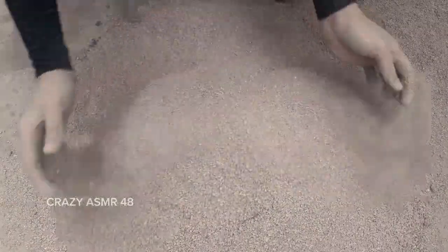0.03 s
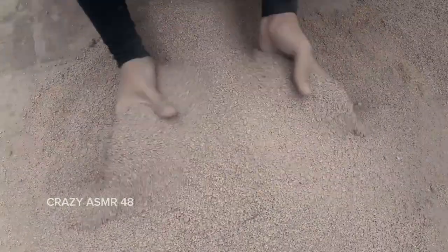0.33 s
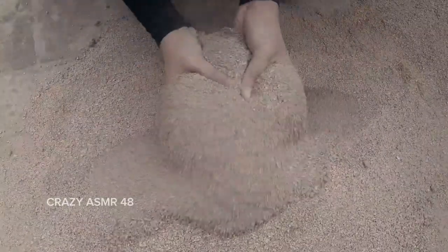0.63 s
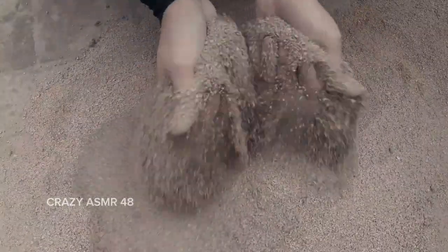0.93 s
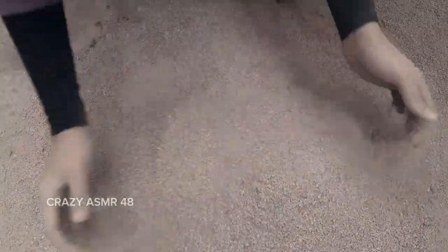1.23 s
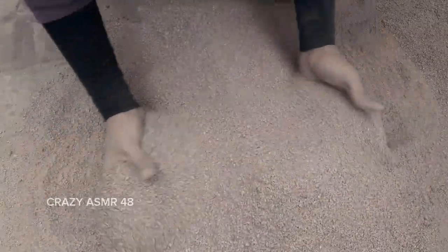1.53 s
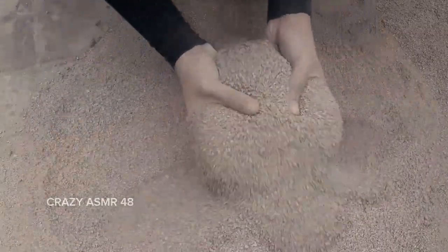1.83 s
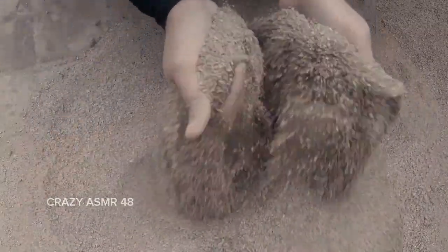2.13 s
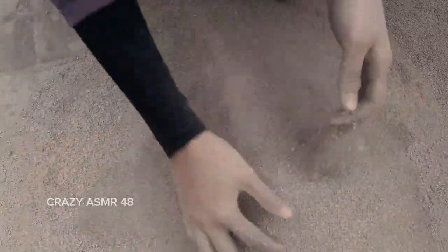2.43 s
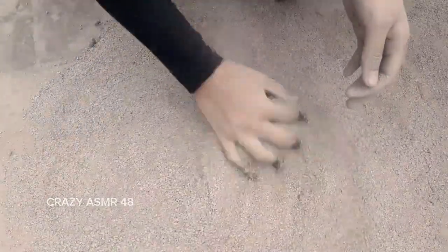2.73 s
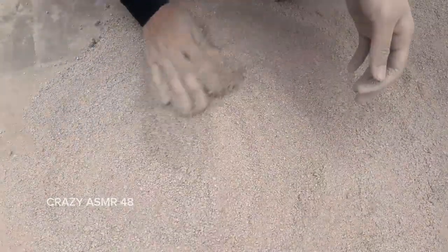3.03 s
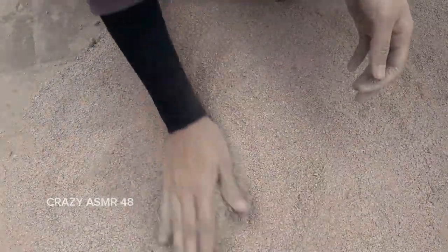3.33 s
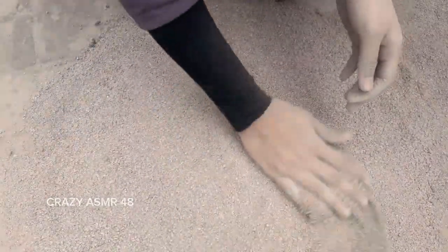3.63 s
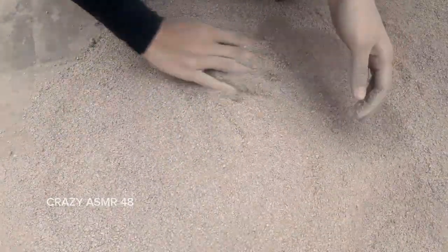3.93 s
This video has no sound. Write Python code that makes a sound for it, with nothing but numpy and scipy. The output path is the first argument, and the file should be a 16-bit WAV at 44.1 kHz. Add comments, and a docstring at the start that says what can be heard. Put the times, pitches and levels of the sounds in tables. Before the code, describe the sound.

Dry, gritty sand crunches and hisses as two hands dig in, lift it and let it pour, twice. A palm then softly brushes the heap smooth. The sound is close, with a faint motor droning far away.

```python
"""Two hands dig into dry, gritty sand, lift a heap that crumbles, and let it pour back in a fine hiss.
Just past one second they dig, lift and pour again. From about 2.5 s one palm brushes the heap smooth
in two strokes, and a few sharp grains tick. Each gesture is a dense shower of tiny grain contacts
with its own colour. A motor drones far away throughout. It is all heard close up and in mono,
through a small microphone with a resonant housing."""
import sys
import numpy as np
from scipy.fft import rfft, irfft, next_fast_len
from scipy.io import wavfile
from scipy.ndimage import map_coordinates

SR = 44100
rng = np.random.default_rng(int(sys.argv[2]) if len(sys.argv) > 2 else 0)


def store_wav(level_fs):
    """Save 16-bit WAV to argv[1]."""
    pcm = np.round(np.clip(np.atleast_2d(level_fs), -1, 1) * 32767)
    wavfile.write(sys.argv[1], SR, pcm.T.astype(np.int16))


N = 176400

# Gesture cues. A release loses 10 dB every release_s.
# fingers and palm skim the loose surface: start_s, attack_s, hold_s, release_s, level_db
SKIMS = [(-.06, 0.045, .04, 0.4, -43.5), (.12, 0.12, 0.015, 0.26, -32.5), (1.14, 0.05, 0.016, 0.076, -38.5),
         (1.33, .13, 0.014, .19, -32), (2.3, 0.082, .01, 0.12, -37), (2.47, 0.058, 0.078, 0.18, -36),
         (3.26, 0.053, 0.17, .1, -44), (3.45, 0.067, 0.078, 0.37, -42)]
# hands press through the heap: start_s, attack_s, hold_s, release_s, level_db
PUSHES = [(.15, 0.1, 0.31, 0.1, -27.5), (1.35, 0.21, 0.055, 0.23, -27.5)]
# a lifted double handful gives way in surges: start_s, attack_s, hold_s, release_s, level_db
CRUMBLES = [(.57, .31, 0.027, 0.11, -19), (.9, 0.027, 0.026, .055, -20), (1.8, 0.24, 0.061, .13, -21)]
# the flat palm strokes the heap: start_s, attack_s, hold_s, release_s, level_db
BRUSHES = [(2.46, 0.12, 0.19, 0.33, -39.5), (3.12, 0.43, 0.33, .14, -40)]
# fine sand streams off the fingers: start_s, attack_s, hold_s, release_s, level_db
POURS = [(-.05, 0.018, 0.059, 0.3, -29.5), (.17, .06, 0.022, 0.028, -30), (.56, 0.48, .05, .1, -33.5),
         (.8, 0.099, 0.34, 0.16, -27.5), (1.38, 0.083, 0.017, 0.046, -28.5), (1.6, .13, 0.19, 0.16, -38.5),
         (1.95, .25, 0.19, 0.19, -27.5), (2.34, 0.077, .03, 0.055, -28), (2.6, 0.28, .3, 0.34, -47),
         (3.24, 0.05, 0.024, 0.26, -38.5)]
# dislodged grains run down the slope: start_s, attack_s, hold_s, release_s, level_db
SLIDES = [(-.05, 0.046, 0.05, 0.069, -36.5), (.18, .05, .03, 0.039, -36), (1.39, 0.1, .02, 0.087, -44),
          (2.5, 0.3, 0.2, 0.09, -46), (3.45, .35, .14, .1, -41)]
# sharp grains knock together: start_s, level_db
TICKS = [(3.492, -31.5), (3.517, -32.5)]
# reflection off the moving palm: time_s, lowest_dip_hz, echo_gain
PALM_ECHO = [(2.45, 7900, 0), (2.7, 5940, 0.04), (3.0, 4470, 0.1), (3.2, 3200, 0.7), (3.28, 9700, 0.23),
             (3.45, 11100, 0), (3.56, 8000, 0), (3.72, 5360, 0), (4, 4173, 0)]

# Colours are EQ curves: they set the tone, not the level.
# raspy mids of a skim: frequency_hz, gain_db
SKIM_COLOUR = [(200, -8), (500, -7), (1000, 7), (1400, -1), (1800, 0.5), (2600, 3), (4300, 0), (6000, -5.5),
               (9000, -23), (15500, -8)]
# dull body of a push: frequency_hz, gain_db
PUSH_COLOUR = [(25, -35), (120, -1), (250, -0.5), (400, 0), (650, 0), (1100, 0), (1500, -6), (2200, -14.5),
               (4000, -34.5), (8500, -29), (15500, -30)]
# midrange crunch of a crumble: frequency_hz, gain_db
CRUMBLE_COLOUR = [(25, -45), (150, -39), (300, -7), (440, -7.5), (600, 2.5), (1100, 3.5), (1500, -2.5),
                  (2200, -4.5), (3200, -8), (5200, -15), (7000, -16), (9000, -19), (15500, -50)]
# soft rub of the palm: frequency_hz, gain_db
BRUSH_COLOUR = [(60, -32), (420, -9), (650, 3), (1100, -3.5), (1400, -15), (1800, -13), (2400, -14),
                (4000, -18.5), (15500, -36)]
# airy hiss of a pour: frequency_hz, gain_db
POUR_COLOUR = [(300, -15), (700, -38), (1500, -13.5), (3000, -18.5), (5200, -10), (7000, -11), (9000, -9.5),
               (11000, -1), (13500, 1), (15500, 5.5)]
# thin sizzle of a slide: frequency_hz, gain_db
SLIDE_COLOUR = [(1500, -21), (5000, -20.5), (6500, -2), (8000, -1.5), (10000, 2), (12000, 5.5),
                (15500, -3.5)]
# brittle top of a tick: frequency_hz, gain_db
TICK_COLOUR = [(2000, -30.5), (9000, -23), (11500, -13), (14000, -7), (15500, 5)]
# rumble and hiss of the still surroundings: frequency_hz, gain_db
AIR_COLOUR = [(10, -55), (30, -37), (45, -11), (65, -8.5), (110, 4.5), (150, -0.5), (230, -4.5), (310, -7),
              (420, -16.5), (750, -12), (1100, -18), (1500, -25), (3000, -28), (5500, -31), (9000, -32),
              (11500, -31), (15500, -21)]

# the distant motor's wandering drone: time_s, pitch_hz, level_db
DRONE = [(0, 129, -42), (.25, 130, -38.5), (.55, 122.6, -68), (.9, 138.3, -38.5), (1.1, 132.4, -48),
         (1.32, 130, -38), (1.52, 119, -41), (1.76, 137, -34), (2.2, 133, -37), (2.45, 128, -52),
         (2.8, 127.4, -33.5), (2.98, 126, -44), (3.2, 133, -36.5), (3.48, 115.9, -45), (4, 118.4, -35.5)]
# a lower hum that swells and fades: time_s, pitch_hz, level_db
LOW_HUM = [(0, 55, -60), (.45, 57, -48), (.7, 67, -42), (1, 72, -40), (1.25, 65, -47), (1.5, 60, -70)]
# hums that hold their pitch: pitch_hz, level_db
STEADY_HUMS = [(176, -55.5), (201, -49)]
# resonances of the microphone housing: centre_hz, width_hz, lift_db
HOUSING_RESONANCES = [(607, 113, 2), (751, 260, 3.5), (1081, 214, 4.5), (1280, 137, 3), (1626, 160, 3),
                      (1807, 260, 8.5), (2292, 210, 7.5), (2774, 187, 7.5), (3345, 250, 8),
                      (3816, 310, 7.5), (4357, 180, 9), (4850, 116, 9), (5434, 81, 7.5), (7130, 1390, 9.5)]

AIR_DB, CUTOFF_HZ = -35.5, 15750


def skim():
    """Fingers scuff loose grains; the highs lead, so the rasp dulls as the hand sinks in."""
    return grains(gestures(SKIMS, curve=1.7), SKIM_COLOUR,
                  per_s=22000, size_db=2, clump_db=0, clump_hz=62, lag_s=-0.0089)


def push():
    """Grains grind together as the hands press through the heap; the lows trail behind."""
    return grains(gestures(PUSHES, curve=0.63), PUSH_COLOUR,
                  per_s=12000, size_db=1.5, clump_db=1.1, clump_hz=22, lag_s=-0.018)


def crumble():
    """The lifted handful gives way in a crunch that starts low and opens up."""
    return grains(gestures(CRUMBLES, curve=2.22), CRUMBLE_COLOUR,
                  per_s=14000, size_db=2, clump_db=0.6, clump_hz=39.3, lag_s=0.011)


def brush():
    """The flat palm rubs over the heap in a soft wash of evenly sized contacts."""
    return grains(gestures(BRUSHES, curve=1), BRUSH_COLOUR,
                  per_s=18000, size_db=1, clump_db=0.9, clump_hz=22)


def pour():
    """Fine sand streams off the fingers and lands with a bright hiss."""
    return grains(gestures(POURS, curve=0.57), POUR_COLOUR,
                  per_s=24000, size_db=2.5, clump_db=0.9, clump_hz=68)


def slide():
    """Dislodged grains sizzle down the slope."""
    return grains(gestures(SLIDES, curve=0.74), SLIDE_COLOUR,
                  per_s=24000, size_db=2, clump_db=1, clump_hz=52)


def ticks():
    """A few sharp grains collide in tiny, bright bursts."""
    attack_s, hold_s, release_s = 0.002, 0.003, 0.015
    cues = [(start_s, attack_s, hold_s, release_s, level_db) for start_s, level_db in TICKS]
    return grains(gestures(cues, curve=1), TICK_COLOUR,
                  per_s=6000, size_db=4, clump_db=-1, clump_hz=100)


def grains(envelope, colour, per_s, size_db, clump_db, clump_hz, lag_s=0):
    """Random contacts, mostly small, in clumps; stronger motion makes them denser and louder."""
    chance = np.clip(per_s / SR * np.sqrt(envelope / envelope.max()), 1e-3, 1)
    sizes = from_db(size_db * np.minimum(rng.exponential(1, N), 5)) * rng.choice([-1, 1], N)
    clicks = sizes * (rng.random(N) < chance) / np.sqrt(chance)  # same power at any density
    clumping = from_db(clump_db * drift(clump_hz))
    shower = coloured(clicks * clumping, colour)
    return swept(shower, envelope, lag_s) if lag_s else shower * envelope


def gestures(cues, curve):
    """One envelope from all cues, summed in power: each swells as time ** curve, holds and dies away."""
    t, power = np.arange(N) / SR, 1e-12
    for start_s, attack_s, hold_s, release_s, level_db in cues:
        rise = np.clip((t - start_s) / attack_s, 0, 1) ** curve
        fall_db = -10 * np.maximum(t - start_s - attack_s - hold_s, 0) / release_s
        power = power + (rise * from_db(level_db + fall_db)) ** 2
    return np.sqrt(power)


def swept(x, envelope, lag_s):
    """Apply the envelope lag_s later for each octave up, so the colour moves within a gesture."""
    t, octaves, out = np.arange(N) / SR, np.arange(-2, 3), 0
    for octave in octaves:
        def band_db(hz):
            share = np.interp(np.log2(hz / 2000), octaves, octaves == octave)
            return 20 * np.log10(1e-6 + share)
        out = out + filtered(x, band_db) * np.interp(t - lag_s * octave, t, envelope)
    return out


def palm_echo(x):
    """A short reflection off the palm hollows the sound; its comb of dips moves with the hand."""
    dip_hz, echo_gain = automation(PALM_ECHO)
    delay_s = 0.5 / dip_hz  # half a cycle late at the lowest dip
    echo = map_coordinates(x, [np.arange(N) - delay_s * SR], order=3)
    return (x + echo_gain * echo) / np.sqrt(1 + echo_gain ** 2)


def distant_motor():
    """Far-off machinery: a wandering drone, a lower swell and two hums of steady pitch."""
    drone = hum(*automation(DRONE), waver_db=1.8)
    swell = hum(*automation(LOW_HUM), waver_db=-1)
    steady = sum(hum(np.full(N, hz), db, waver_db=3) for hz, db in STEADY_HUMS)
    return drone + swell + steady


def hum(pitch_hz, level_db, waver_db):
    """A low sine tone whose level wavers at random."""
    rms = from_db(level_db + waver_db * drift(9.1))
    return np.sqrt(2) * rms * np.sin(2 * np.pi * np.cumsum(pitch_hz) / SR)


def air():
    """The still surroundings: a bed of low rumble and faint hiss."""
    return from_db(AIR_DB) * coloured(rng.standard_normal(N), AIR_COLOUR)


def drift(rate_hz):
    """A smooth random wobble, mostly slower than rate_hz, at unit power."""
    return unit_power(filtered(rng.standard_normal(N), lambda hz: -20 * np.log10(1 + (hz / rate_hz) ** 2)))


def coloured(x, colour):
    """Shape a signal with a colour curve, 20 dB down above the cutoff, at unit power."""
    points_hz, gain_db = np.transpose(colour)

    def response_db(hz):
        return np.interp(np.log(hz), np.log(points_hz), gain_db) - 20 * (hz > CUTOFF_HZ)
    return unit_power(filtered(x, response_db))


def filtered(x, response_db):
    """EQ by a function that gives dB for each frequency."""
    size = next_fast_len(N + SR // 10)
    hz = np.maximum(np.arange(size // 2 + 1) * SR / size, 1)
    return irfft(rfft(x, size) * from_db(response_db(hz)), size)[:N]


def automation(rows):
    """Straight ramps between timed points, one curve for each column after the time."""
    time_s, *columns = np.transpose(rows)
    return [np.interp(np.arange(N) / SR, time_s, column) for column in columns]


def from_db(db):
    """Decibels to gain."""
    return 10 ** (np.asarray(db) / 20)


def unit_power(x):
    """Scale to an RMS of one."""
    return x / np.sqrt(np.mean(x ** 2) + 1e-20)


def scene():
    """Close sand under the palm's echo, over air and motor, alike in both channels."""
    sand = skim() + push() + crumble() + brush() + pour() + slide() + ticks()
    return np.tile(palm_echo(sand) + air() + distant_motor(), (2, 1))


def record(dry):
    """The microphone housing adds a row of resonant peaks, then the top is cut steeply."""
    def response_db(hz):
        peaks_db = sum(lift_db * 0.5 ** ((2 * (hz - centre_hz) / width_hz) ** 2)
                       for centre_hz, width_hz, lift_db in HOUSING_RESONANCES)
        top_cut_db = np.clip((hz - CUTOFF_HZ) / 2, 0, 100)
        return peaks_db - top_cut_db
    return np.array([filtered(channel, response_db) for channel in dry])


dry = scene()
out = record(dry)
store_wav(out)
```